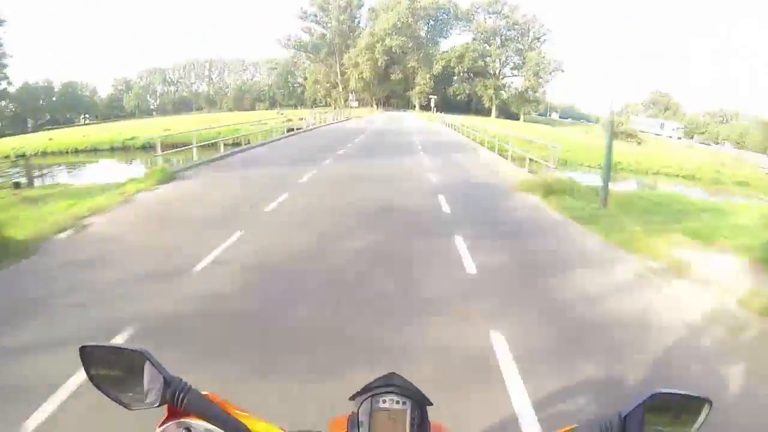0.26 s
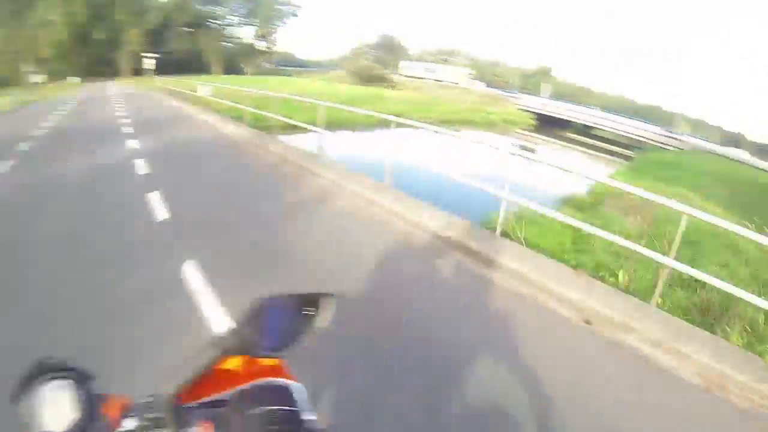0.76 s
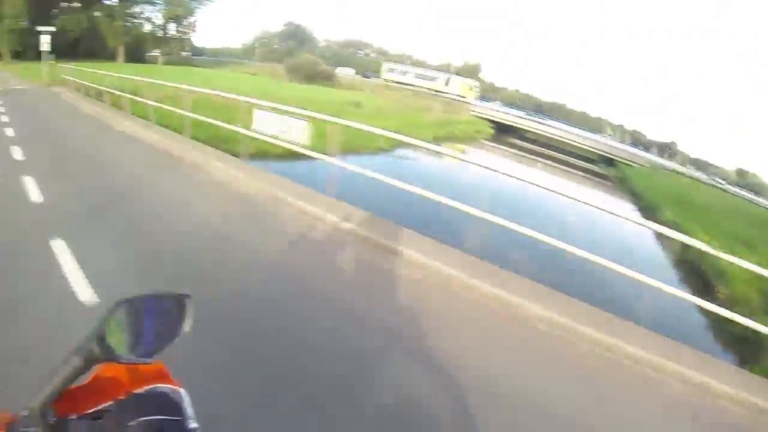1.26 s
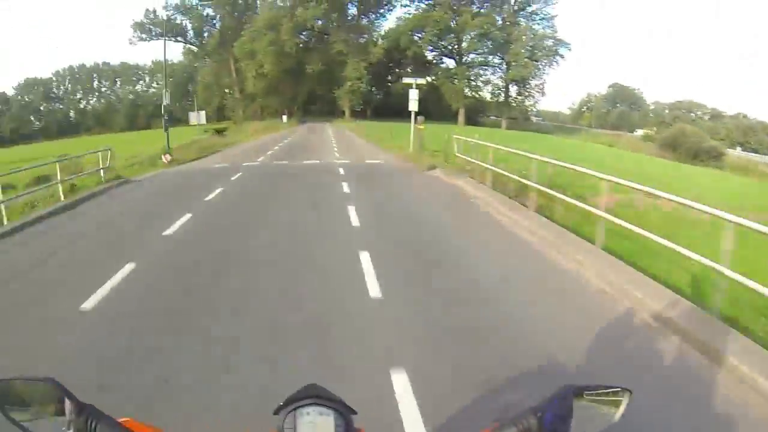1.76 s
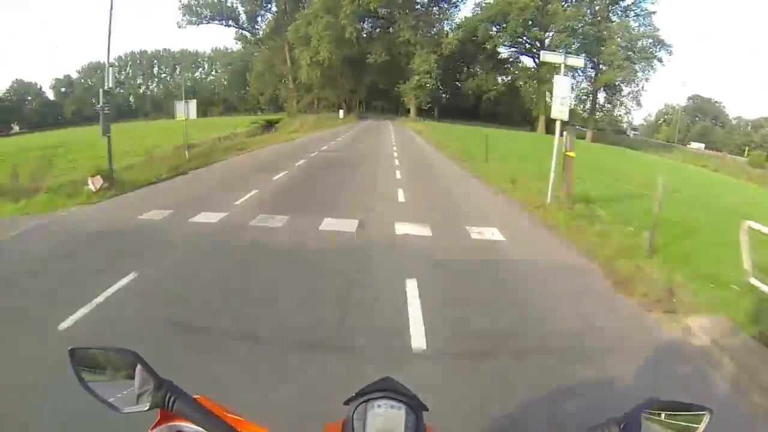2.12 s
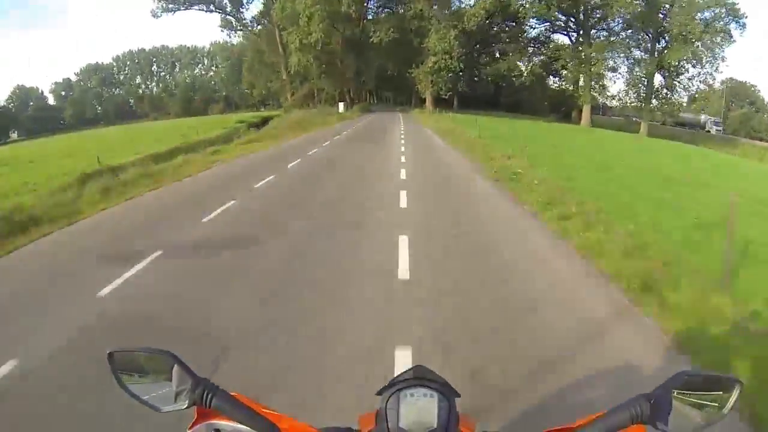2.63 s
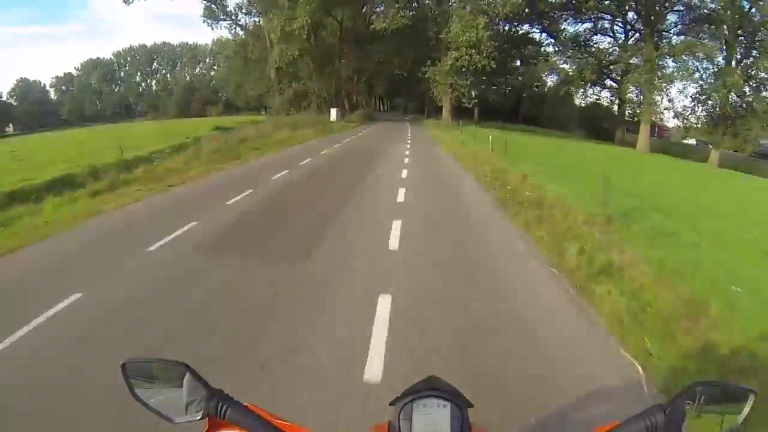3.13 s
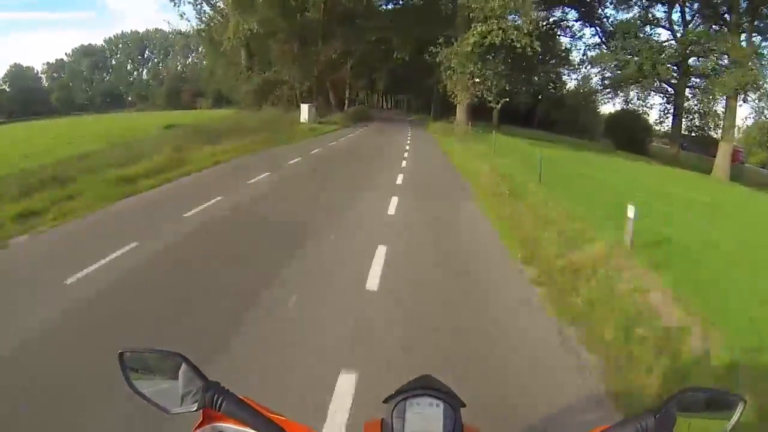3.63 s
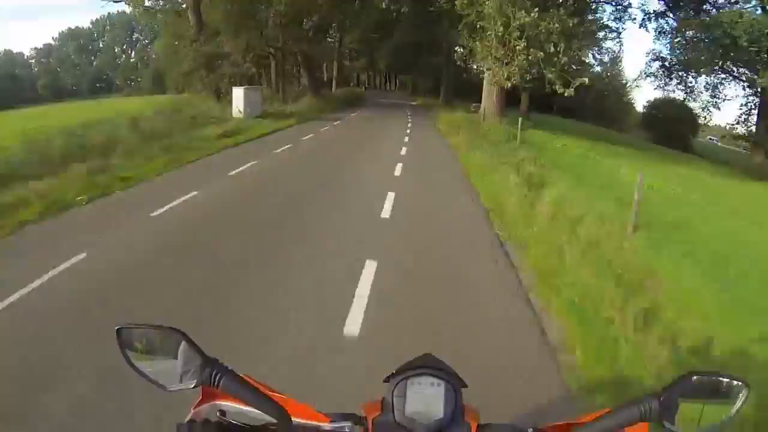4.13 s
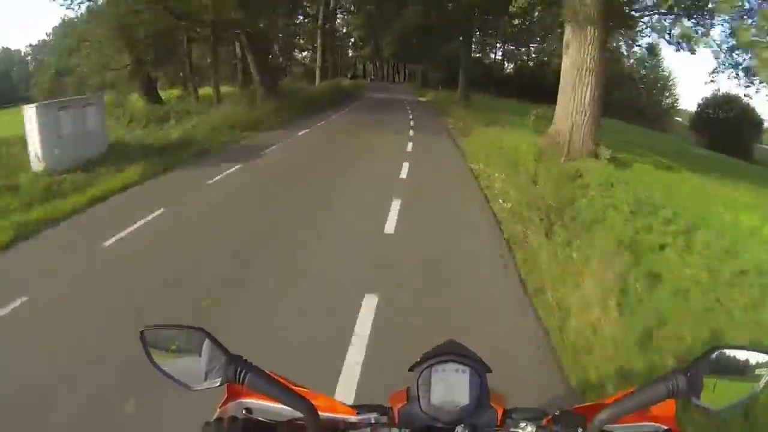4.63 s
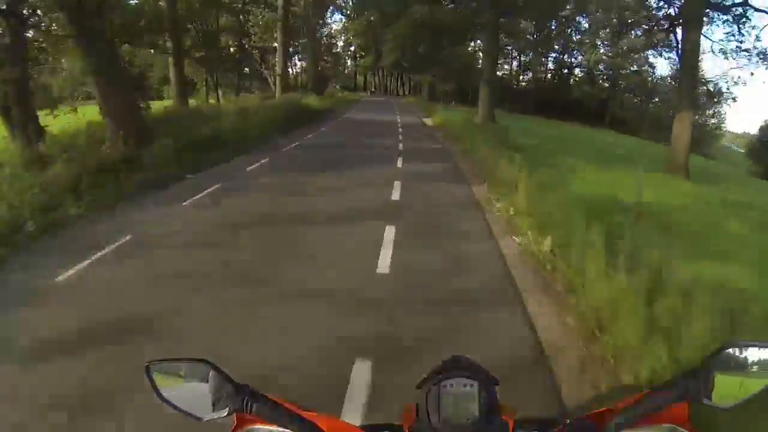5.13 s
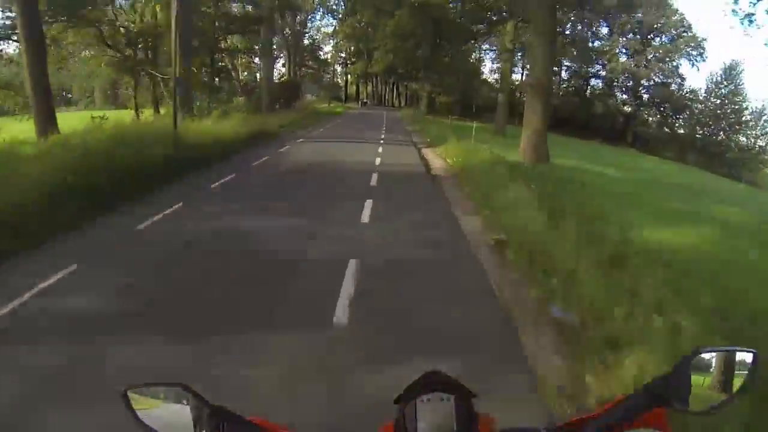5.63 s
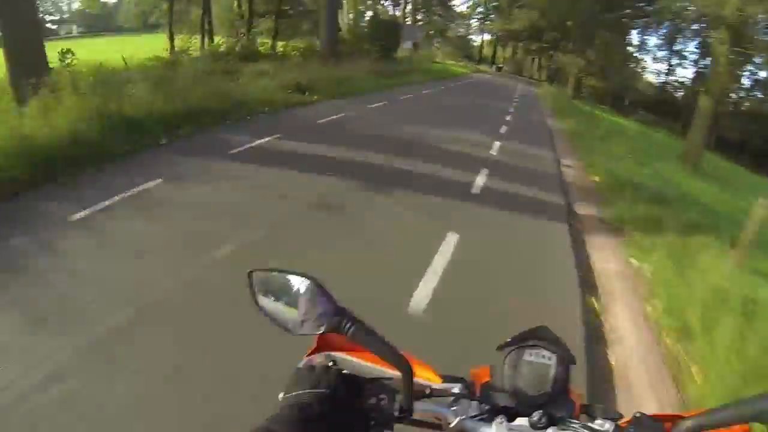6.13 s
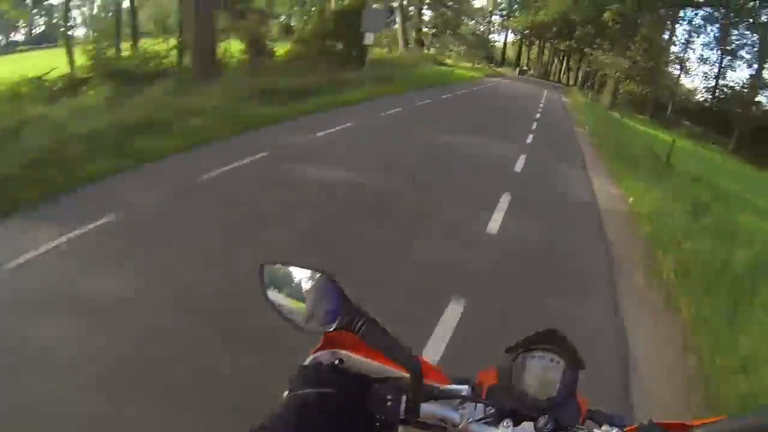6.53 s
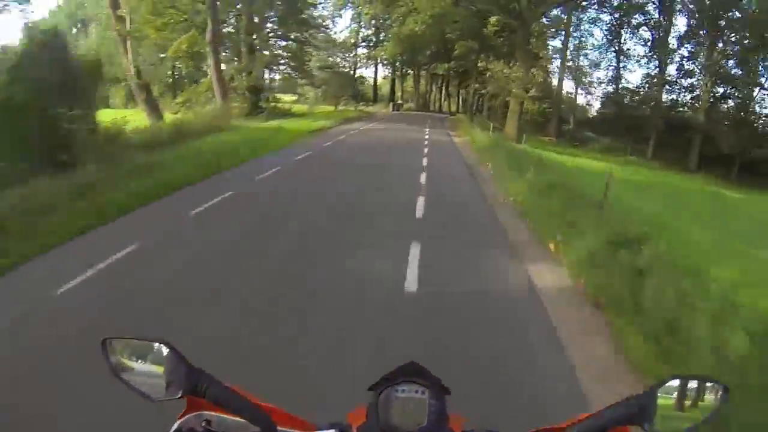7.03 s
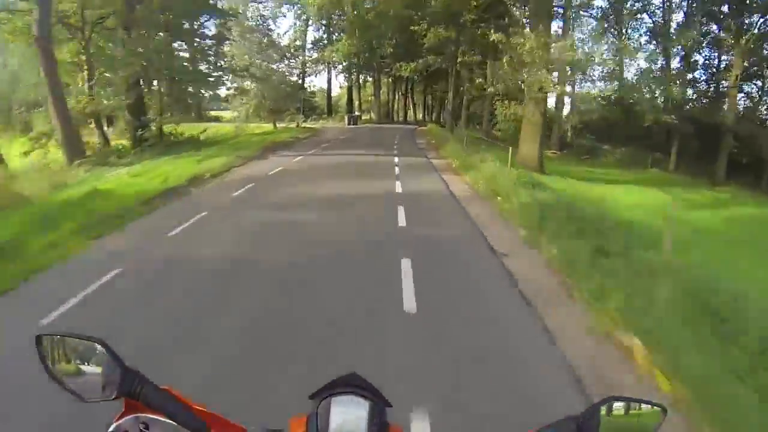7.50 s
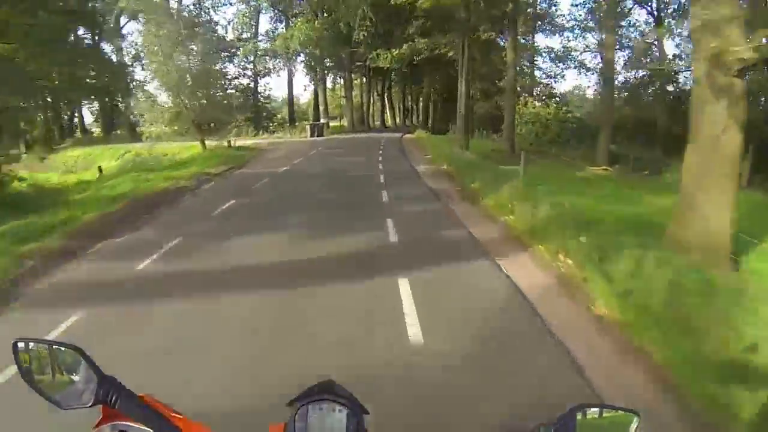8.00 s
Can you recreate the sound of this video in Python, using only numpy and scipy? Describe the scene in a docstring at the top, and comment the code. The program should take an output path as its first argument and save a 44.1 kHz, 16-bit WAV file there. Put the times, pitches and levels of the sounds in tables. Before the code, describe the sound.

On an open country road, a single-cylinder motorcycle hums low under heavy wind, heard from a microphone on the rider's helmet. Deep flutter and thuds come irregularly. About one second in, a head turn brings a bright tearing rush with tiny high whistles, then steadier roar and hiss. The engine slowly sinks in pitch, briefly dulling midway; a weaker rush comes later.

```python
"""On a country road a single-cylinder motorcycle slowly loses speed, heard from a housing on the rider's helmet.
Wind buffets the helmet as a slow eddy tone with bands of deep noise, and roars and hisses over the housing.
Turns of the head bring a bright, torn rush of noise; short gliding sines whistle at the edges.
Underneath hum the engine, a stack of harmonics locked to the firing rate with a drone and a gear whine,
the dull noise of the tyres and a faint electronic buzz."""
import sys
import numpy as np
from scipy import signal
from scipy.fft import rfft, irfft, next_fast_len
from scipy.io import wavfile
from scipy.ndimage import uniform_filter1d

SR = 44100
rng = np.random.default_rng(int(sys.argv[2]) if len(sys.argv) > 2 else 0)


def generate_wav(signal):
    """Clip the signal to [-1, 1] and save it as 16-bit WAV at the path in sys.argv[1]."""
    frames = np.transpose(np.atleast_2d(signal))
    scaled = np.clip(frames, -1, 1) * 32767
    pcm = np.round(scaled).astype(np.int16)
    wavfile.write(sys.argv[1], SR, pcm)


N = 364266
TIME = np.arange(N) / SR  # s

# Engine speed. Each row: time in seconds, firings per second.
FIRING_RATE = [(0, 56.8), (.85, 55.7), (1.4, 55.1), (1.95, 54.65), (3.05, 53.85), (3.6, 53.2), (4.0, 52.75),
               (4.55, 52.4), (4.8, 51.4), (5.25, 50.8), (6.35, 50.3), (8.26, 49.5)]
# Narrow resonances and notches of the housing. Each row: centre in Hz, width in Hz, lift in dB.
HOUSING_RESONANCES = [(3330, 130, -1.5), (3590, 120, 2), (4330, 260, 1.5), (4660, 140, 5.5),
                      (4990, 110, 5.5), (5280, 220, -0.5), (5550, 140, 3.5), (6650, 160, -2.5),
                      (6920, 200, 2.5), (7550, 260, -3), (7980, 260, 1.5), (9550, 350, 3)]
# The head is turned out of the airflow.
# Each row: start in seconds, end in seconds, fade in seconds, rush level in dB, hollow note level in dB.
HEAD_TURNS = [(1.08, 1.42, 0.77, -36, -33), (6.13, 6.85, .2, -43, -56), (7.68, 8.26, 0.28, -50, -42.5)]
CRUISE_RATE = 53  # firings per second at which the speed-dependent levels stand at their settings


def from_db(db):
    """Decibels to gain."""
    return 10 ** (np.asarray(db) / 20)


def rms_one(x):
    """Scale to rms 1."""
    return x / np.sqrt(np.mean(x ** 2) + 1e-20)


def in_time(rows):
    """Draw each column of a breakpoint curve at every sample."""
    s, *columns = np.transpose(rows)
    return [np.interp(TIME, s, c) for c in columns]


def drift(rate):
    """Slow random wander of rms about 1, changing about `rate` times a second."""
    # noise through a double pole at 1/40 of the sample rate, its settling time dropped
    pole = np.exp(-80 * np.pi * rate / SR)
    noise = rng.standard_normal(N // 40 + 2002)
    slow = signal.lfilter([1], [1, -2 * pole, pole * pole], noise)[2000:]
    return np.interp(np.arange(N) / 40, np.arange(len(slow)), rms_one(slow))


def cycles(hz):
    """Running phase of a moving frequency, in radians."""
    return 2 * np.pi * np.cumsum(hz) / SR


def tone(phase, db):
    """A sine of the given rms level."""
    return np.sqrt(2) * from_db(db) * np.sin(phase)


def air_noise(spectrum, resonances=()):
    """Turbulence noise of rms 1 with a broad colour and bell-shaped resonances on top."""
    size = next_fast_len(N)
    hz = np.maximum(np.fft.rfftfreq(size, 1 / SR), 1)
    points_hz, points_db = np.transpose(spectrum)
    db = np.interp(np.log(hz), np.log(points_hz), points_db)
    # beyond its end points the spectrum falls 24 dB an octave
    db -= 24 * np.abs(np.log2(hz / np.clip(hz, points_hz[0], points_hz[-1])))
    for centre, width, lift in resonances:
        db += lift * np.exp(-2 * ((hz - centre) / width) ** 2)
    white = rfft(rng.standard_normal(size))
    return rms_one(irfft(white * from_db(db), size)[:N])


def evened(x, span_s):
    """Take the slow swells out of a noise and keep its fast lumps."""
    size = max(int(span_s * SR), 2)
    power = uniform_filter1d(uniform_filter1d(x ** 2, size), size)
    return x / np.sqrt(power + 1e-12)


def swell(start, end, attack, release):
    """Rise smoothly to 1 by `start`, hold until `end`, and fall again."""
    outside = np.maximum((start - TIME) / attack, (TIME - end) / release)
    return np.cos(np.pi / 2 * np.clip(outside, 0, 1)) ** 2


def bump(s, half):
    """A smooth hump of height 1 around a moment."""
    out, near = np.zeros(N), np.abs(TIME - s) < half
    out[near] = np.cos(np.pi / 2 * (TIME[near] - s) / half) ** 2
    return out


def together(gains):
    """Joint gain of unrelated sounds: their powers add."""
    return np.sqrt(sum(gain ** 2 for gain in gains))


def overspeed():
    """Firings per second above cruising speed, negative below it."""
    return in_time(FIRING_RATE)[0] - CRUISE_RATE


def lumps(hz):
    """Gain with which lumps of turbulence hitting the helmet drive a resonance at this pitch."""
    # Each row: time in seconds, half length in seconds, level at its centre pitch in rms dB, centre in Hz.
    buffets = [(0.115, .25, -36, 170), (0.425, .12, -22, 110), (0.686, 0.23, -26.5, 55),
               (1.095, 0.28, -12.5, 54), (1.145, 0.29, -24.5, 200), (1.298, 0.22, -16.5, 84),
               (1.453, 0.14, -21.5, 200), (2.526, 0.14, -20.5, 170), (2.75, 0.2, -21, 130),
               (2.997, 0.13, -21, 55), (3.07, 0.12, -22.5, 175), (3.48, 0.33, -22.5, 163),
               (3.666, 0.17, -16.5, 54), (3.854, 0.38, -23.5, 121), (4.3, 0.33, -28, 160),
               (4.568, 0.18, -26, 90), (4.823, 0.28, -24, 140), (5.775, 0.29, -25.5, 94),
               (7.282, 0.16, -24, 90), (7.95, 0.37, -30.5, 215)]
    fall_db = 9.5  # loss one octave from the centre, growing with the square of the distance
    return together(from_db(db - fall_db * np.log2(hz / centre) ** 2) * bump(s, half)
                    for s, half, db, centre in buffets)


def buffeting():
    """Eddies leave the helmet at a nearly regular rate; their turbulence thuds, rumbles and booms in the shell."""
    # Spells of strong, regular eddy shedding. Each row: time in seconds, half length in seconds, rms dB.
    spells = [(0.123, .25, -21), (0.804, 0.27, -18.5), (1.34, 0.14, -18.5), (2.596, 0.33, -14),
              (4.25, 0.23, -17), (4.73, 0.18, -13.5), (7.427, 0.23, -18)]
    # Colours of the thud, rumble and boom. Each row: frequency in Hz, relative density in dB per Hz.
    thud_colour = [(32, -31), (44, -15), (52, -0.5), (57, 0.5), (68, -11), (78, -8), (95, -16.5)]
    rumble_colour = [(60, -22), (76, -2), (88, 3), (100, -1), (125, -10), (150, -24)]
    boom_colour = [(100, -33), (130, -4), (150, -3.5), (174, 2.5), (190, -1), (215, -7), (270, -13),
                   (305, -22.5), (400, -37.5)]
    speed_db = 0.6 * overspeed()  # dB for each firing per second

    # steady levels in dB wander, and the spells or lumps add their power
    eddy = cycles(21.0 * (1 + 0.087 * drift(7.0)))  # around 21 Hz
    steady_eddy = from_db(-23.5 + speed_db + 2.7 * drift(4))
    strong_eddy = together(from_db(db) * bump(s, half) for s, half, db in spells)
    shedding = np.hypot(steady_eddy, strong_eddy) * tone(eddy, 1.6 * drift(16))

    thud_gain = np.hypot(from_db(-31 + speed_db + 1.8 * drift(10)), lumps(hz=57.7))
    thud = thud_gain * evened(air_noise(thud_colour), span_s=0.11)
    rumble_gain = np.hypot(from_db(-29.5 + speed_db + 2.1 * drift(7.7)), lumps(hz=93.4))
    rumble = rumble_gain * evened(air_noise(rumble_colour), span_s=0.1)
    boom_gain = np.hypot(from_db(-29 + speed_db + 1.47 * drift(7.5)), lumps(hz=182))
    boom = boom_gain * evened(air_noise(boom_colour), span_s=0.073)
    return shedding + thud + rumble + boom


def wind_roar():
    """Air scrubs the housing and blows its cavities; deep lumps and a turned head add to the hollow note."""
    # Airflow over the housing. Each row: time in seconds, roar level in dB before trim, surges and flicker.
    airflow = [(0, -33.5), (.4, -34.5), (.75, -31), (1.25, -29), (1.5, -27.5), (1.68, -31), (1.95, -31.5),
               (2.3, -34.5), (2.95, -34), (3.3, -33), (3.85, -33), (4.15, -35.5), (5.85, -36.5),
               (6.15, -33), (6.9, -33.5), (7.2, -38), (7.7, -34.5), (8.26, -36)]
    # Brief surges lifting roar and hiss. Each row: time in seconds, half length in seconds, lift in dB.
    surges = [(2.717, 0.11, 3), (3.153, 0.19, 3), (4.24, 0.045, 2), (6.815, 0.09, 3)]
    # Fine hiss of air along the helmet. Each row: time in seconds, level in dB before surges and flicker.
    hiss_level = [(0, -52.5), (2.4, -53.5), (3.25, -52.5), (3.8, -53), (4.35, -56), (5.0, -53), (6.8, -54),
                  (7.3, -55.5), (8.26, -55.2)]
    # Colours of the hollow note, roar and hiss. Each row: frequency in Hz, relative density in dB per Hz.
    hollow_colour = [(300, -19), (450, -15), (560, -8.5), (620, -3.5), (690, 2), (755, -2), (840, -18),
                     (1100, -23), (2500, -66)]
    roar_colour = [(500, -31), (850, -18.5), (1080, -18.5), (1220, -10), (1350, -3), (1500, 0.5),
                   (1620, -3.5), (1780, -6.5), (2000, -15), (2300, -20.5), (3100, -19.5), (3750, -23),
                   (4200, -34), (6000, -58)]
    hiss_colour = [(2000, -29), (3600, -0.5), (4300, -7.5), (4800, 0.5), (6000, -3), (7200, -7.5),
                   (8400, -11.5), (9200, -19.5), (11000, -19), (12300, -21.5), (13200, -24), (15000, -27)]
    hollow_db, hollow_follows = -40, 0.59  # level at mean airflow and cruise; share of the airflow's swing
    lump_db, roar_trim_db = -21, 0.55

    flow_db, = in_time(airflow)
    swing_db = flow_db - flow_db.mean()
    flicker = drift(20)
    surge_db = sum(db * bump(s, half) for s, half, db in surges)

    blown = from_db(hollow_db + hollow_follows * swing_db + 0.54 * overspeed())
    turned = sum(from_db(db) * swell(start, end, fade, fade) for start, end, fade, _, db in HEAD_TURNS)
    hollow_gain = together([blown, turned, from_db(lump_db) * lumps(hz=57)])
    hollow = hollow_gain * evened(air_noise(hollow_colour), span_s=0.15)

    roar_gain = from_db(flow_db + roar_trim_db + surge_db + 0.47 * flicker)
    roar = roar_gain * evened(air_noise(roar_colour, HOUSING_RESONANCES), span_s=0.21)

    # the hiss takes half of each surge
    hiss_db = in_time(hiss_level)[0] + 0.5 * surge_db
    hiss = from_db(hiss_db + 0.5 * flicker) * air_noise(hiss_colour, HOUSING_RESONANCES)
    return hollow + roar + hiss


def gust():
    """With the head turned, the flow tears off the housing's edges in a bright, unsteady rush."""
    # Air strikes from the side as the head swings out and back.
    # Each row: start in seconds, end in seconds, level in dB.
    crosswind = [(0.924, 0.955, -38), (1.236, 1.398, -37.5)]
    # Colours of the side spray and the rush. Each row: frequency in Hz, relative density in dB per Hz.
    spray_colour = [(1000, -19), (2000, -7.5), (2800, 3), (3600, -3), (4200, -12.5), (4900, -8.5),
                    (6000, -9), (8200, -12.5), (9300, -19), (11200, -19.5), (12000, -26), (15000, -32)]
    rush_colour = [(300, 0), (520, -5), (680, 4), (820, -3), (980, 2), (1200, -2), (1800, 4.5), (2300, -19),
                   (3500, -9), (4500, -44), (9000, -41)]
    attack_s, release_s = 0.22, 0.33  # onset and dying away of the crosswind

    tearing = drift(40)
    side = together(from_db(db) * swell(start, end, attack_s, release_s) for start, end, db in crosswind)
    turned = sum(from_db(db) * swell(start, end, fade, fade) for start, end, fade, db, _ in HEAD_TURNS)
    spray = side * from_db(0.92 * tearing) * air_noise(spray_colour, HOUSING_RESONANCES)
    rush = turned * from_db(0.7 * tearing) * air_noise(rush_colour, HOUSING_RESONANCES)
    return spray + rush


def whistles():
    """Now and then an edge locks the flow into a short wavering tone."""
    # Each row: centre in seconds, half length in seconds, pitch at the centre in Hz (start of the glide
    # lies half a length earlier), glide in Hz per second, level at the peak in rms dB.
    edge_tones = [(0.816, 0.027, 3500, -2, -32.5), (.84, 0.028, 3870, 0, -44), (.87, .026, 3510, 0, -32.5),
                  (0.947, .04, 3600, 504, -41), (1.27, 0.069, 3500, 0, -39.5), (1.425, .05, 3600, 0, -42),
                  (1.46, .03, 6780, 0, -57.5), (1.502, 0.026, 3660, -4000, -35),
                  (1.528, 0.041, 3520, -1000, -38.5)]
    out, waver_hz = np.zeros(N), 45 * drift(120)
    for s, half, hz, glide, db in edge_tones:
        near = np.abs(TIME - s) < half
        since = TIME[near] - s
        envelope = np.cos(np.pi / 2 * since / half) ** 2
        out[near] += envelope * tone(cycles(hz + glide * since + waver_hz[near]), db)
    return out


def engine():
    """One exhaust pulse every second turn gives a harmonic stack, duller off the throttle; gears whine in step."""
    # Exhaust note. Each row: multiple of the firing rate, level in rms dB before easing and drift.
    harmonics = [(1, -33), (2, -38), (3, -41), (4, -46.5), (5, -45), (6, -55), (7, -53), (8, -55.5),
                 (10, -53.5), (11, -59), (12, -56), (13, -53.5), (14, -55)]
    # The drone breaks off as the load changes. Each row: start in seconds, end in seconds, depth in dB.
    drone_breaks = [(4.1, 4.15, 13), (4.75, 8.26, 9)]
    # The whine rises as the drive takes up load again.
    # Each row: start in seconds, end in seconds, attack in seconds, release in seconds, level in dB.
    load_rises = [(4.85, 5.0, .14, 1.7, -57.5)]
    drone_order, gear_order = 9, 43.93  # multiples of the firing rate
    drone_hz, drone_width_hz, drone_db = 477, 30, -39.5  # narrow resonance that the ninth harmonic slides through
    exhaust_ease_db, full_multiple = 8, 7  # treble loss off the throttle, complete from this multiple up
    whine_db, whine_ease_db = -62.5, 6

    firing_hz, = in_time(FIRING_RATE)
    # the rider eases the throttle once: it closes quickly, stays shut and opens slowly
    eased = swell(4.15, 4.6, attack=0.16, release=0.9)
    phase = cycles(firing_hz * (1 + 0.0019 * drift(6.54)))

    exhaust = 0
    for k, db in harmonics:
        dulled_db = exhaust_ease_db * min(k / full_multiple, 1) ** 2 * eased
        start_phase = rng.uniform(0, 2 * np.pi)
        exhaust = exhaust + tone(k * phase + start_phase, db - dulled_db + 2.2 * drift(5.6))

    detuning = 2 * (drone_order * firing_hz - drone_hz) / drone_width_hz
    # it breaks quickly and builds up again slowly
    broken_db = sum(db * swell(start, end, attack=0.18, release=0.44) for start, end, db in drone_breaks)
    drone = tone(drone_order * phase, drone_db - broken_db + 1.1 * drift(14)) / (1 + detuning ** 2)

    loaded = sum(from_db(db) * swell(start, end, attack, release)
                 for start, end, attack, release, db in load_rises)
    whine_gain = np.hypot(from_db(whine_db - whine_ease_db * eased), loaded)
    whine = whine_gain * tone(gear_order * phase, 2.8 * drift(10))
    return exhaust + drone + whine


def tyres():
    """Rolling on smooth asphalt gives a dull, even noise that follows the speed."""
    # Each row: frequency in Hz, relative density in dB per Hz.
    tyre_colour = [(150, -15), (250, -0.5), (330, 0), (420, -3.5), (520, -7), (650, -23), (1000, -20)]
    return from_db(-44 + 0.24 * overspeed()) * air_noise(tyre_colour)


def electronics_buzz(pitch_hz=11400, level_db=-78):
    """A faint high tone of the electronics, wavering in pitch and pulsing about 60 times a second."""
    pulses = 0.5 + 0.5 * np.cos(2 * np.pi * 59.94 * TIME)
    return from_db(level_db) * rms_one(pulses * np.sin(cycles(pitch_hz + 35 * drift(60))))


def scene():
    """Everything meets at the one microphone on the helmet."""
    wind = buffeting() + wind_roar() + gust() + whistles()
    bike = engine() + tyres()
    return (wind + bike + electronics_buzz())[None]


def record(dry):
    """A steep low-pass cuts the top above 15 kHz."""
    return signal.sosfilt(signal.ellip(10, 0.1, 90, 15000, fs=SR, output="sos"), dry)


dry = scene()
out = record(dry)
generate_wav(out)
```